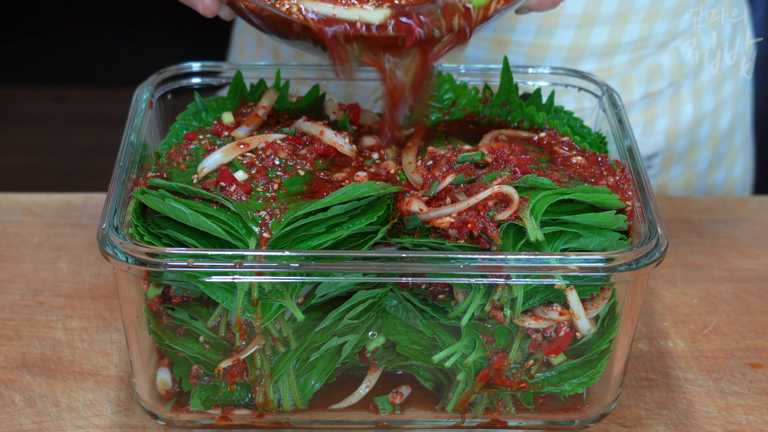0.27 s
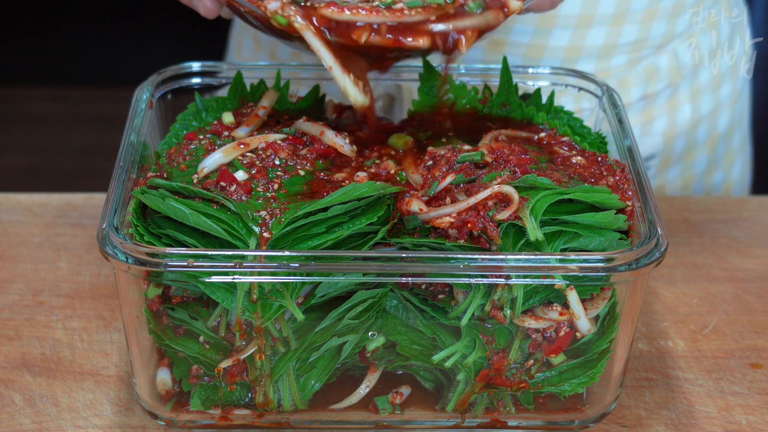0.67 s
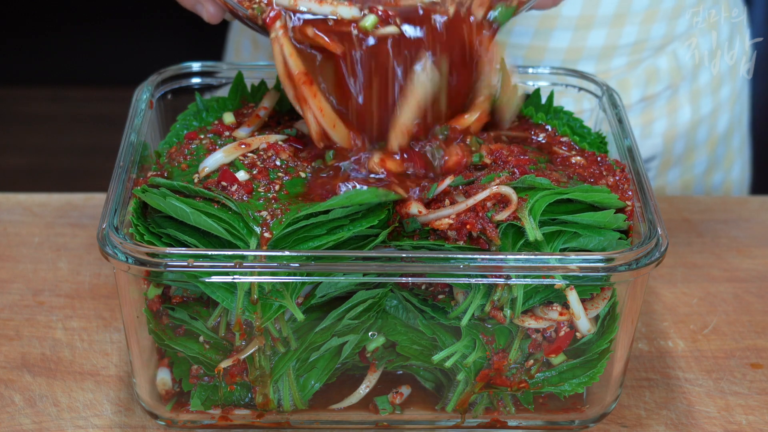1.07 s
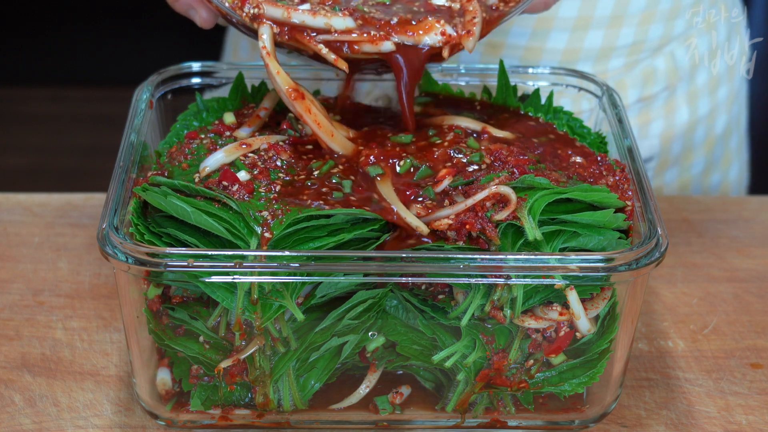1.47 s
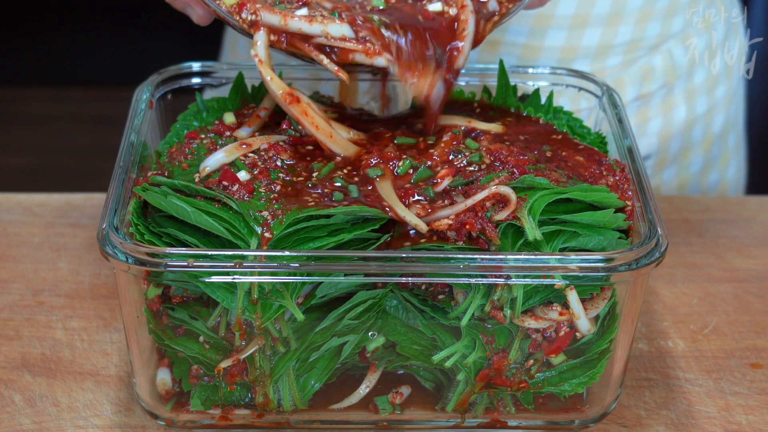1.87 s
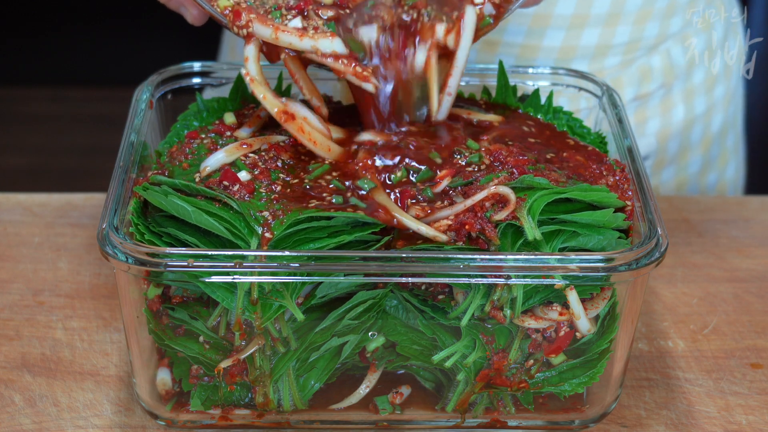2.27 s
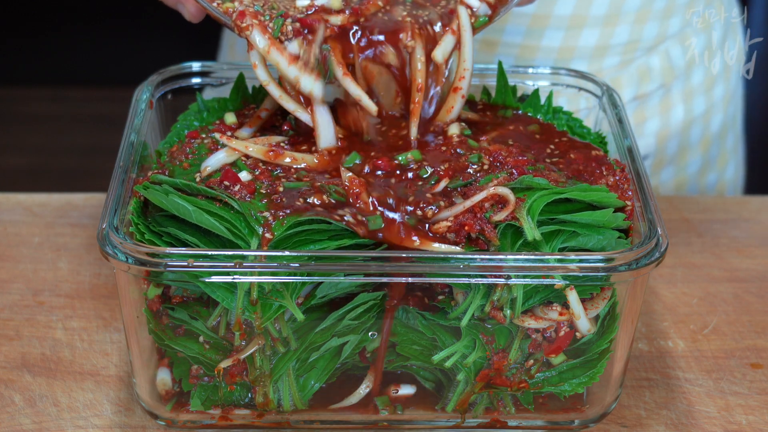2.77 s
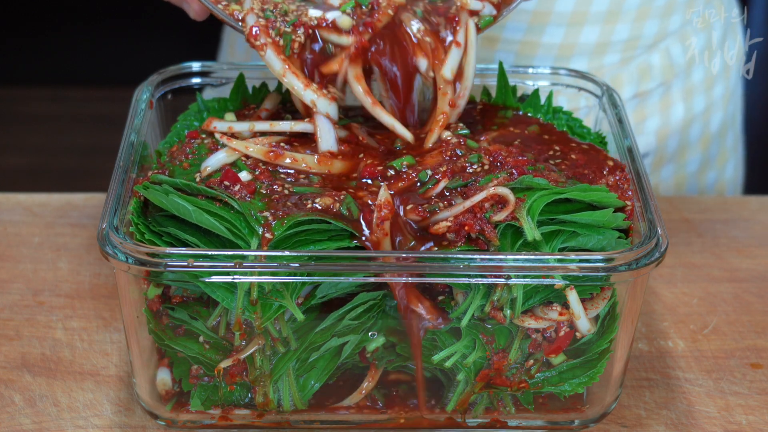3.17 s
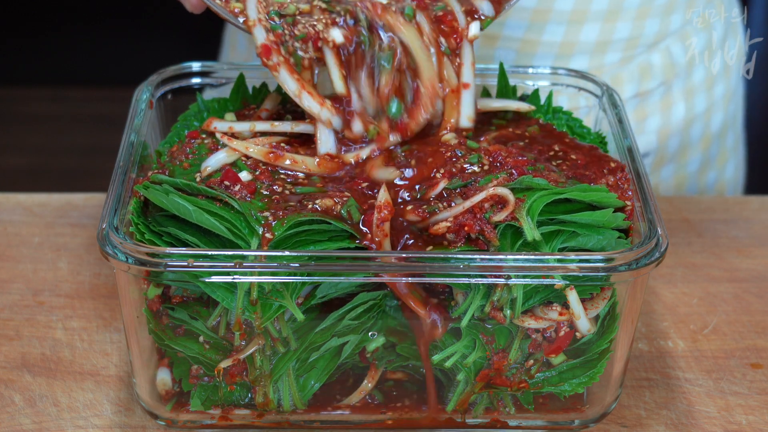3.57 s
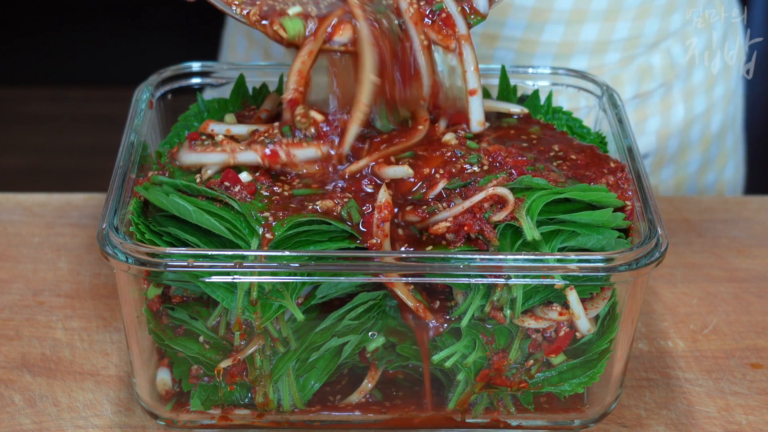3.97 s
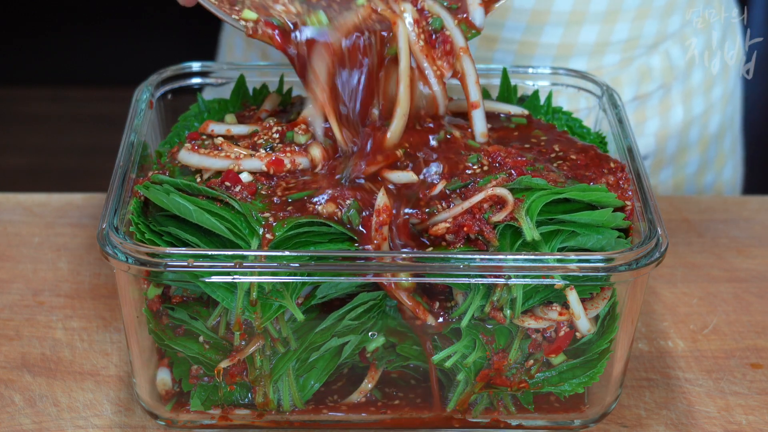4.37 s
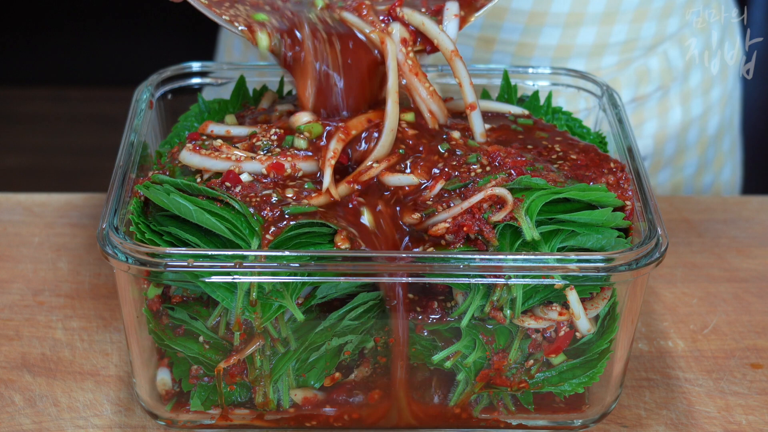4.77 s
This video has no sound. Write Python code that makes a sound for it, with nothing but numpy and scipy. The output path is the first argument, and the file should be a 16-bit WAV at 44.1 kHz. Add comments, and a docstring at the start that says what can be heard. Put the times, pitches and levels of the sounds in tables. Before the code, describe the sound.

Sparse wet pops and tiny bubble ticks from thick sauce poured over leaves, soft squelches, two dull hollow knocks, quiet kitchen hum.

```python
"""Trapped air pops and ticks as thick sauce slides from a bowl onto leaves in a glass dish.
Each pop is a filtered snap of the film with a dying sine for the bubble; fat drips ring lower and softer.
The heap squelches in shaped noise, tiny bubbles crackle, and a hollow body is knocked nearby, as decaying
modes with a noise thud and a boom. A hard-walled kitchen reverberates through sparse random taps.
Under it all lie appliance hum in wavering tones and fuzz, noise for the air, and a distant rumble."""
import sys
import numpy as np
from scipy import signal
from scipy.fft import rfft, irfft
from scipy.io import wavfile
from scipy.ndimage import uniform_filter1d

SR = 44100
rng = np.random.default_rng(int(sys.argv[2]) if len(sys.argv) > 2 else 0)


def transcribe(u):
    """Save the signal u as a 16-bit wav file named by the first command-line argument.

    u: samples, shape (n,) or (channels, n), limited to [-1, 1]; the rate is SR.
    q: integer samples, one column per channel.
    """
    v = np.clip(np.atleast_2d(u).T, -1, 1)
    q = np.round(v * 32767).astype(np.int16)
    wavfile.write(sys.argv[1], SR, q)


N = 221584

# Distant low rumble: (time [s], level [dB])
RUMBLE_LEVEL = [(0.0, -51), (0.4, -62), (2.2, -57.5), (2.9, -60), (3.9, -52), (4.17, -64), (4.64, -62),
                (5.02, -64.5)]
# Spectrum of the room air: (frequency [Hz], relative density [dB per Hz])
AIR_SPECTRUM = [(12, -60), (20, -66), (82, 3.5), (200, -14), (237, -8.5), (323, 2.5), (583, -10),
                (690, -9.5), (794, -9.5), (1470, -31.5), (2120, -24.5), (3140, -30), (4160, -29),
                (15200, -28.5), (16500, -21)]
AIR_DB = -53.5
# Appliance hum, before its slow variation:
# (frequency [Hz], tone level [dB rms], fuzz width [Hz], fuzz level [dB rms])
HUM_LINES = [(199.4, -78, 44, -60.5), (268.5, -63, 2.3, -76.5), (315, -67, 8.9, -65),
             (678.2, -63, 5.3, -69.5), (756, -68.5, 8.1, -90.5), (2080, -79, 460, -77.5),
             (4160, -84, 170, -80), (5870, -88.5, 94, -91), (15654, -88, 200, -84)]
HUM_WAVER_DB, FUZZ_FLUTTER_DB = 2.2, 2.5  # rms of the slow tone swell and the faster fuzz swell
# Reverberation of the kitchen: (frequency [Hz], T60 [s], level [dB])
KITCHEN_DECAY = [(100, 0.46, 0.5), (620, 0.64, -9), (1560, 0.77, -2.5), (3000, 0.79, -1.5),
                 (6000, 0.35, -3), (10000, 0.51, 1), (15000, 0.37, -2)]
# Reflections from counter and walls: (delay [s], level [dB])
EARLY_ECHOES = [(.006, -9.5), (.0095, -26), (.017, -23)]
# Blows, the first just before the start: (time [s], blow level [dB], boom level [dB], glassy ring level [dB])
KNOCK_EVENTS = [(-.06, -19.5, -37, -39), (1.527, -21.5, -21, -58), (4.63, -53, -49, -84)]
# Modes of the knocked hollow body: (frequency [Hz], level re blow [dB], T60 [s])
HOLLOW_MODES = [(67.6, -19.5, 0.1), (215.5, -10, 0.077), (371.4, -6, 0.11), (445, -1.5, 0.088),
                (519, -5.5, 0.12), (641.3, 5.5, 0.091), (759, 6, 0.028), (872, 2.5, 0.012),
                (1130, -5, 0.055), (1480, -14, 0.051), (1835, -12.5, 0.025), (2950, -31, 0.062)]
# Spectrum of the blow's noise: (frequency [Hz], relative density [dB per Hz])
THUD_SPECTRUM = [(60, -33), (300, -40), (700, 13), (1300, -31.5), (2200, -7), (5000, -51), (9000, -62)]
# Air resonance of the cupboard under the counter: (frequency [Hz], T60 [s], rise [s])
CUPBOARD_BOOM = (131.6, 0.32, 0.02)
# Dish shaken by the blow: (frequency [Hz], T60 [s], rise [s])
DISH_RING = (3990, 0.043, 0.0011)
# The heap slumps and squeezes sauce between the leaves: (time [s], squelch level at the top [dB])
SLUMP_EVENTS = [(.46, -56.5), (1.12, -67), (2.15, -82), (2.75, -67), (2.47, -55), (3.48, -58.5),
                (3.92, -64), (4.47, -59), (4.7, -64), (4.979, -64)]
SLUMP_RISE_DB_PER_S, SLUMP_FALL_DB_PER_S, SEEP_DB = 174, 85, -67.5
# Spectrum of the squelch: (frequency [Hz], relative density [dB per Hz])
SQUELCH_SPECTRUM = [(300, 5.5), (600, 6.5), (850, 5), (1100, 8), (1500, -1), (2500, -15.5), (5000, -20)]
# Soft puffs of foam: (time [s], half length [s], centre [Hz], half width [octaves], level [dB])
FIZZ_PUFFS = [(3.322, 0.085, 10600, 0.35, -67), (3.515, 0.051, 6000, .12, -70.5)]
# Slow-starting tones: fat drips, and at 4.61 s two tones of the faint third knock: (time [s], peak level [dB],
# pitch [Hz])
DRIP_EVENTS = [(2.46, -49, 1213), (2.475, -52.5, 832), (2.701, -40.5, 455), (3.47, -50, 934),
               (4.444, -54, 940), (4.61, -41.5, 751), (4.611, -47, 1055)]
DRIP_T60_S = 0.064
# Air pockets bursting, and at 2.424 s a treble echo of the pop at 2.418 s: (time [s], ring peak level [dB],
# bubble pitch [Hz], ring T60 [s], snap peak level [dB], snap centre [Hz])
POP_EVENTS = [(.28, -25.5, 5630, 0.004, -22.5, 13800), (.2865, -44, 14000, .003, -33, 9000),
              (0.3332, -41, 2633, 0.023, -47, 5300), (.338, -23.5, 2580, 0.0018, -22, 4670),
              (.3385, -44, 5250, .003, -40, 12000), (0.4173, -43, 8450, 0.013, -33, 10000),
              (0.9348, -39.5, 8800, 0.0052, -30.5, 10500), (0.941, -58, 2950, 0.019, -49, 3500),
              (0.971, -51, 4930, 0.0036, -33, 9000), (0.996, -55, 14000, .003, -37, 10600),
              (1.015, -35.5, 5870, 0.0037, -32, 12000), (1.025, -37, 14700, 0.004, -28, 10200),
              (1.047, -57, 4100, 0.0073, -56, 4500), (1.065, -48, 10000, .005, -38, 9000),
              (1.1523, -36.5, 1470, 0.027, -42, 7000), (1.256, -55, 2620, 0.0078, -48, 3550),
              (1.408, -48, 11500, 0.019, -46, 7100), (1.408, -56, 3960, .014, -60, 4000),
              (1.4155, -45, 2120, 0.012, -55, 3980), (1.4503, -28.5, 9500, 0.0071, -39, 8900),
              (2.356, -51.5, 4950, .0066, -58, 5000), (2.366, -47.5, 1480, 0.026, -60, 3000),
              (2.4088, -48, 8200, 0.0089, -62, 8000), (2.418, -28, 2600, 0.0098, -26, 4170),
              (2.4185, -36, 14400, 0.0022, -32.5, 13000), (2.424, -34, 13500, .002, -38, 10000),
              (2.4596, -42, 2820, 0.0078, -44, 3940), (2.646, -56, 3900, 0.026, -46, 4500),
              (2.6848, -39.5, 3100, 0.0044, -43, 4640), (2.706, -51, 3760, 0.012, -40, 7600),
              (2.9045, -47.5, 1550, 0.038, -46, 3000), (3.878, -45, 10160, 0.0093, -28.5, 12700),
              (3.918, -52, 5000, .004, -54, 6000), (3.942, -63, 3500, 0.0037, -39, 5000),
              (3.951, -43.5, 7450, 0.0057, -44, 2480), (3.967, -45, 5400, 0.0048, -38, 2180),
              (3.9958, -25.5, 7000, 0.0027, -36, 6000), (4.021, -49, 5130, 0.0055, -56, 5500),
              (4.135, -41, 14300, .003, -41, 12000), (4.32, -33, 1910, 0.012, -30, 2580),
              (4.32, -39, 1430, 0.02, -31, 7360), (4.694, -45, 11800, .003, -48, 12500),
              (4.788, -50, 1910, 0.024, -59, 3000), (4.805, -39.5, 3520, 0.01, -34, 4200),
              (4.848, -36.5, 5230, 0.0084, -39, 5000), (4.938, -34, 5650, 0.006, -34, 13300),
              (4.9381, -54, 2560, 0.0025, -30, 3480), (4.9455, -34, 15000, 0.0036, -37, 11100)]
SNAP_OCTAVES, SNAP_SKIRT_DB = 0.78, -25  # half width of a snap's colour at -6 dB; broad floor beneath it
RING_TO_ROOM_DB = -4.5  # the leaves muffle a bubble's ring before it reaches the walls
EDGE_HZ = 15800  # band limit of the recorder


def amp(db):
    """Level definition: an amplitude ratio is 10 to the power dB / 20."""
    return 10 ** (np.asarray(db) / 20)


def evened(x):
    """Normalization: a signal is divided by its root mean square."""
    return x / np.sqrt(np.mean(x ** 2) + 1e-20)


def read(points, hz):
    """Logarithmic interpolation: a table is read along a log-frequency axis."""
    f, value = np.transpose(points)
    return np.interp(np.log(hz + 1), np.log(f + 1), value)


def octave_bell_db(hz, centre_hz, octaves):
    """Band-pass colour: level falls as the square of the distance in octaves, 6 dB at the half width."""
    return -6 * (np.log2(hz / centre_hz) / octaves) ** 2


def add(mix, s, sound):
    """Superposition: a sound is summed into the mix from time s."""
    part = mix[round(s * SR):][:len(sound)]
    part += sound[:len(part)]


def ring(hz, t60, rise_s, glide=0.):
    """Damped oscillation: a soft-started sine decays exponentially; glide raises its pitch as it dies."""
    t = np.arange(round(t60 * SR) + 64) / SR
    shape = (1 - np.exp(-t / rise_s)) * amp(-60 * t / t60)
    phase = 2 * np.pi * hz * t * (1 + glide * t / t60)
    return shape / shape.max() * np.sin(phase)


def noise(field_db):
    """Filtered Gaussian noise: random short-time spectra are weighted by field_db(hz)."""
    hz = np.fft.rfftfreq(1024, 1 / SR)[:, None]
    frames = N // 256 + 5
    real, imag = rng.standard_normal((2, len(hz), frames))
    z = (real + 1j * imag) * amp(field_db(hz))
    z /= np.sqrt(np.mean(abs(z) ** 2))
    return signal.istft(z, nperseg=1024, noverlap=768)[1][:N]


def rumble():
    """Amplitude modulation: a band of low noise follows a slow level curve."""
    level_db = np.interp(np.arange(N) / SR, *np.transpose(RUMBLE_LEVEL))
    return amp(level_db) * evened(noise(lambda hz: octave_bell_db(hz + 1, 105, 0.71)))


def room_air():
    """Broadband noise: a fixed spectrum swells a little at random."""
    swell = evened(uniform_filter1d(rng.standard_normal(N), size=12000))
    return amp(AIR_DB + 1.4 * swell) * evened(noise(lambda hz: read(AIR_SPECTRUM, hz)))


def appliance_hum():
    """Line spectrum: wavering tones stand in resonance-shaped bands of fluttering noise."""
    out = np.zeros(N)
    f, t = np.fft.rfftfreq(N, 1 / SR), np.arange(N) / SR
    white = rfft(rng.standard_normal(N))
    for hz, tone_db, width, fuzz_db in HUM_LINES:
        flutter = evened(signal.resample(rng.standard_normal(50), N))
        fuzz = evened(irfft(white / (1 + (2 * (f - hz) / width) ** 2), N))
        out += amp(fuzz_db + FUZZ_FLUTTER_DB * flutter) * fuzz
        waver = evened(signal.resample(rng.standard_normal(12), N))
        tone = evened(np.sin(2 * np.pi * (hz * t + rng.random())))
        out += amp(tone_db + HUM_WAVER_DB * waver) * tone
    return out


def kitchen(x):
    """Reverberation as convolution: early echoes, then sparse random taps that decay band by band."""
    taps = np.zeros(SR)
    at = np.arange(300, SR - 10, 10)
    taps[at + rng.integers(0, 10, len(at))] = rng.choice([-1., 1.], len(at))
    hz, t, z = signal.stft(taps, SR, nperseg=512)
    bands = np.array(KITCHEN_DECAY)
    t60 = np.maximum(read(bands[:, [0, 1]], hz), .05)[:, None]
    level_db = read(bands[:, [0, 2]], hz)[:, None]
    # decay energy of one tap per 10 samples; dividing by it leaves level_db as each band's energy
    energy = SR / 10 * t60 * 10 * np.log10(np.e) / 60
    z *= amp(level_db - 60 * t / t60) / np.sqrt(energy)
    tail = signal.istft(z, SR, nperseg=512)[1]
    tail *= 1 - np.exp(-np.arange(len(tail)) / SR / 0.0047)  # the reverberation builds up
    for delay, db in EARLY_ECHOES:
        add(tail, delay, amp([db]))
    return signal.fftconvolve(x, tail)[:len(x)]


def knocks(lead):
    """Modal excitation: a blow gives a noise thud, body modes and a boom; time starts lead samples early."""
    body, boom = np.zeros((2, N + lead))
    t = np.arange(4096) / SR
    thuds = evened(noise(lambda hz: read(THUD_SPECTRUM, hz)))
    boom_hz, boom_t60, boom_rise = CUPBOARD_BOOM
    for k, (s, db, boom_db, glass_db) in enumerate(KNOCK_EVENTS):
        at = s + lead / SR
        thud = thuds[k * len(t):][:len(t)]
        add(body, at, amp(db - 8.5 - 60 * t / 0.029) * thud)
        for hz, mode_db, t60 in HOLLOW_MODES:
            add(body, at, -amp(db + mode_db) * ring(hz, t60, rise_s=1.3 / hz))
        add(body, at, amp(glass_db) * ring(*DISH_RING))
        add(boom, at, amp(boom_db) * ring(boom_hz, boom_t60, boom_rise))
        # a weaker neighbour beats with it
        add(boom, at, amp(boom_db - 15.0) * ring(1.17 * boom_hz, boom_t60, boom_rise))
    return body, boom


def squeeze():
    """Exponential growth and decay: each slump rises fast and falls more slowly over a steady seep."""
    s, db = np.transpose(SLUMP_EVENTS)[:, :, None]
    since = np.arange(N) / SR - s
    drop_db = np.where(since < 0, -SLUMP_RISE_DB_PER_S * since, SLUMP_FALL_DB_PER_S * since)
    return amp(SEEP_DB) + amp(db - drop_db).sum(axis=0)


def squelch():
    """Modulated noise: a low-middle band follows the squeeze with random lumps."""
    lumps = evened(uniform_filter1d(rng.standard_normal(N), size=900))
    return evened(noise(lambda hz: read(SQUELCH_SPECTRUM, hz))) * squeeze() * amp(1.4 * lumps)


def fizz():
    """Windowed noise: each puff of foam is a coloured hiss under a Gaussian envelope."""
    out = np.zeros(N)
    t = np.arange(N) / SR
    for s, half, centre_hz, octaves, db in FIZZ_PUFFS:
        hiss = evened(noise(lambda hz: octave_bell_db(hz + 1, centre_hz, octaves)))
        out += amp(db) * hiss * np.exp(-((t - s) / half) ** 2)
    return out


def crackle(per_s=120, level_db=-66, spread_db=3.5):
    """Random point process: tiny bubbles ring at random times, more strongly under the squeeze."""
    spread = np.minimum(rng.exponential(1, N), 4)
    bursts = rng.random(N) < per_s / SR
    size = amp(level_db + spread_db * spread) * bursts * evened(squeeze())
    pitch = np.geomspace(1500, 14000, num=16)
    kind = rng.integers(0, len(pitch), N)
    out = np.zeros(N)
    for k, hz in enumerate(pitch):
        out += signal.oaconvolve(size * (kind == k), ring(hz, 12 / hz, rise_s=1e-4))[:N]
    return out


def drips():
    """Damped resonance: each fat drip, and each of the faint knock's two tones at 4.61 s, is a slow-starting
    damped sine of rising pitch."""
    out = np.zeros(N)
    for s, db, hz in DRIP_EVENTS:
        add(out, s, amp(db) * ring(hz, DRIP_T60_S, rise_s=0.014, glide=0.032))
    return out


def pops():
    """Impulse and resonance: the film snaps as coloured noise, and the bubble rings, gliding up."""
    snaps, rings = np.zeros((2, N))
    t = np.arange(128) / SR
    hz_axis = np.fft.rfftfreq(512, 1 / SR) + 1
    skirt = amp(SNAP_SKIRT_DB) * hz_axis / (hz_axis + 1500)
    for s, db, hz, t60, snap_db, snap_hz in POP_EVENTS:
        grit = rng.standard_normal(len(t))
        burst = (t == 0) + 0.17 * grit * np.exp(-t / 0.001)  # one crack, then grit
        colour = amp(octave_bell_db(hz_axis, snap_hz, SNAP_OCTAVES)) + skirt
        snap = irfft(rfft(np.pad(burst, (64, 320))) * colour)
        # 64 samples early, to undo the padding in front
        add(snaps, s - 64 / SR, amp(snap_db) * snap / abs(snap).max())
        add(rings, s, amp(db) * ring(hz, t60, rise_s=0.04 * t60, glide=0.051))
    return snaps, rings


def scene():
    """Direct and reverberant fields: wet sounds and knocks excite the kitchen, over the background."""
    lead = SR // 10  # room for the blow before the start
    body, boom = knocks(lead)
    snaps, rings = pops()
    struck = body + np.pad(snaps + drips() + crackle(), (lead, 0))
    room = kitchen(struck + amp(RING_TO_ROOM_DB) * np.pad(rings, (lead, 0)))
    close = (struck + room + boom)[lead:] + rings + squelch() + fizz()
    return (close + rumble() + room_air() + appliance_hum())[None]


def record(dry):
    """Band limitation: the deepest bass is removed and the recorder loses the highest treble."""
    thin = signal.sosfilt(signal.butter(2, 42, "highpass", fs=SR, output="sos"), dry)
    lowpass = signal.firwin(511, EDGE_HZ, window=("kaiser", 9), fs=SR)
    return signal.oaconvolve(thin, lowpass[None], "same")


dry = scene()
out = record(dry)
transcribe(out)
```